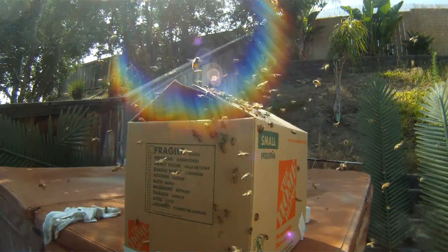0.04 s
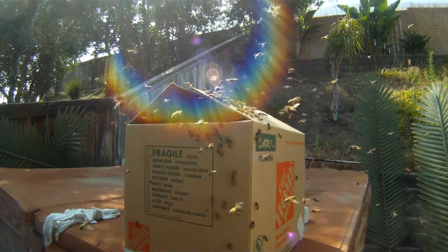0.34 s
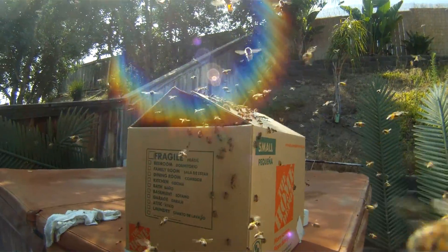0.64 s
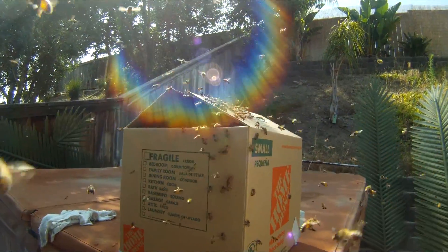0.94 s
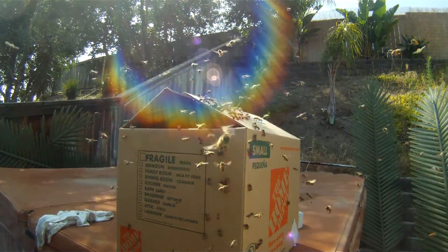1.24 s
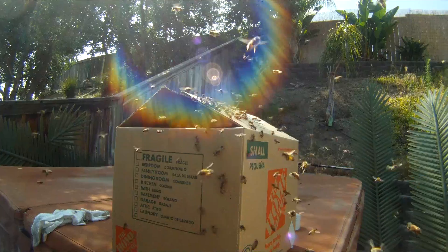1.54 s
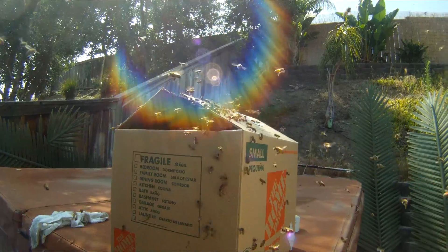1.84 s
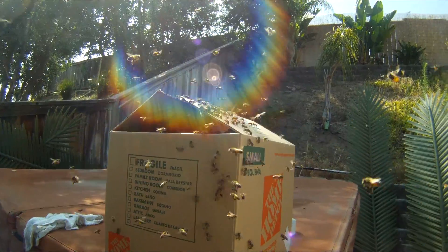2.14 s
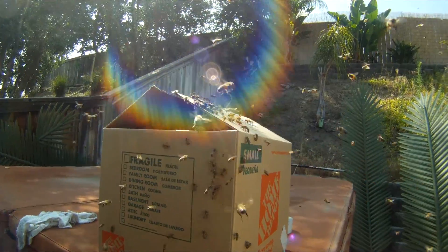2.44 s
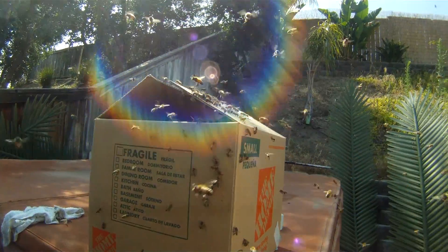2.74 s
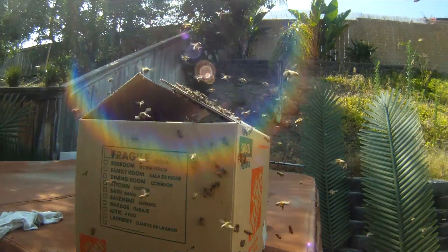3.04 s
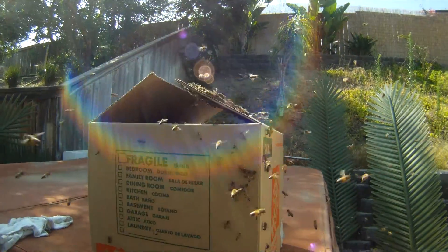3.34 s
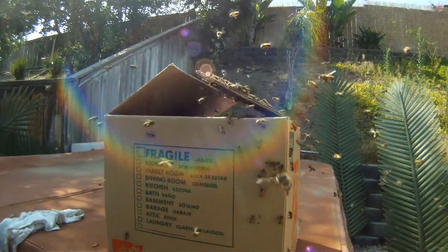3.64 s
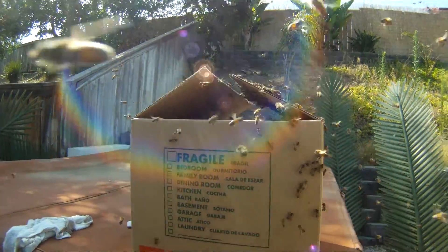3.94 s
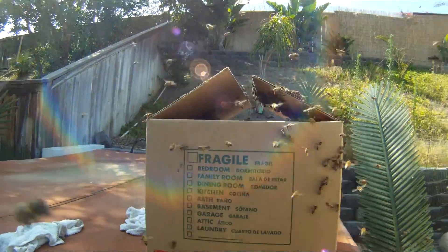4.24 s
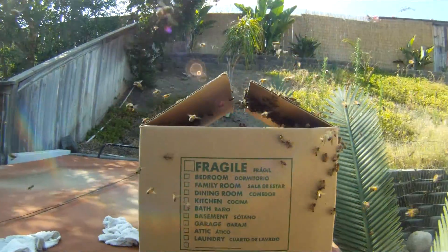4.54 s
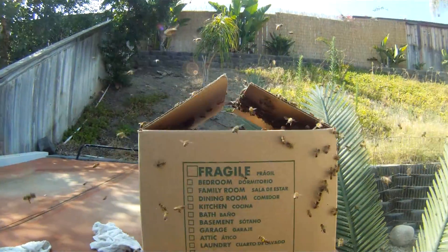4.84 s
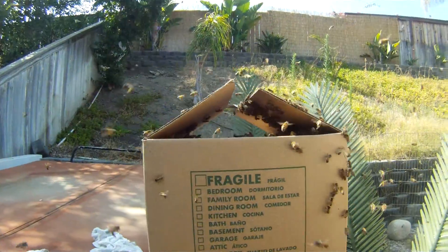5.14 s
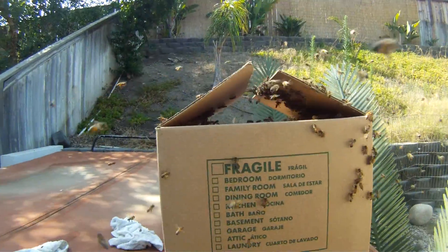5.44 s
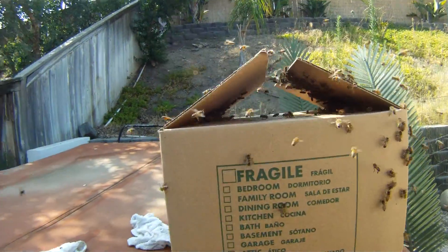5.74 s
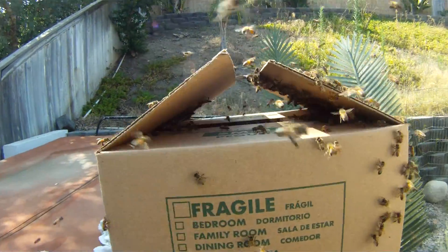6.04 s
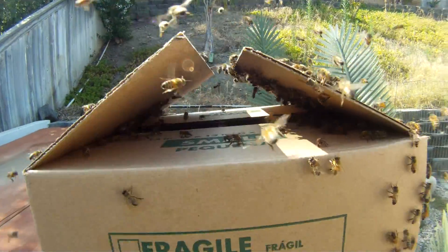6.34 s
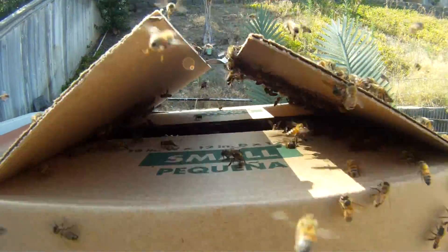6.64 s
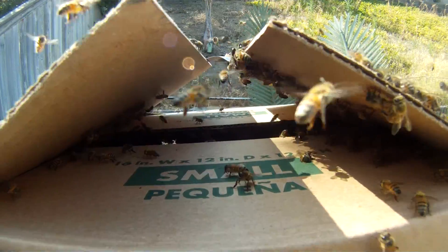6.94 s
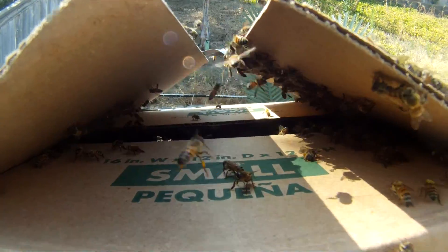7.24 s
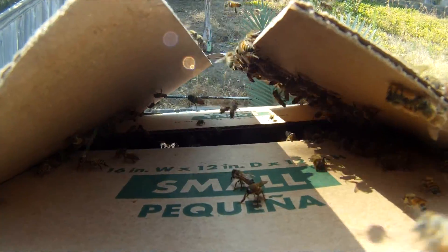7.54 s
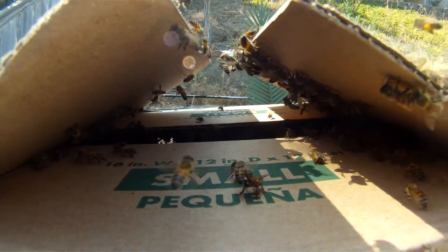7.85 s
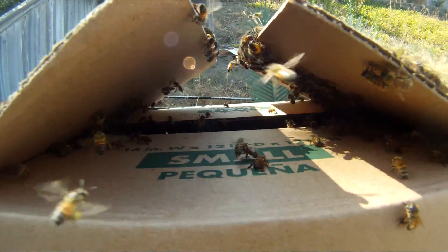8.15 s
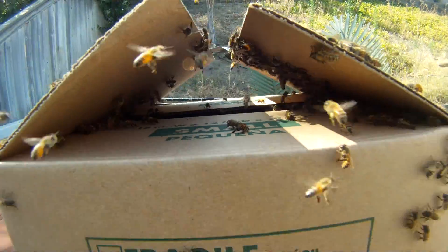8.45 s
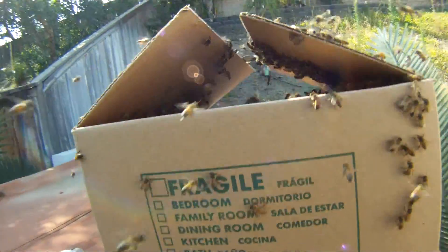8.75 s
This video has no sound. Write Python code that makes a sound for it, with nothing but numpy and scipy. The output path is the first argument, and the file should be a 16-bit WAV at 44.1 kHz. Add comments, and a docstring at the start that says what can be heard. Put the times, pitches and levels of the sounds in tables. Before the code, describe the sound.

A bee swarm hums around a cardboard box, single bees passing close, while the handheld camera rumbles, clicks and creaks.

```python
"""Honeybees hum around a cardboard box in a backyard, over the rumble of a hand holding a small camera.
Single bees pass close from the start and again later; some brush the plastic case with their wings.
From 2.7 s the hand bumps and rubs the case, which clicks and, from 5.3 s, creaks; thin treble ticks
sound now and then. The swarm grows as the camera nears the box; the handling is loudest near 8.9 s.
Throughout, the camera holds each sample at a low rate, so the treble mirrors the mid-range."""
import sys
import numpy as np
from scipy import signal
from scipy.fft import rfft, irfft, next_fast_len
from scipy.io import wavfile
from scipy.ndimage import map_coordinates

SR = 44100
rng = np.random.default_rng(int(sys.argv[2]) if len(sys.argv) > 2 else 0)


def inscribe(sig):
    """Save sig as 16-bit PCM at rate SR to the path in sys.argv[1].

    A 1-D sig is mono; a 2-D sig holds one channel per row.
    Samples are clipped to [-1, 1] before scaling.
    """
    pcm = np.round(np.clip(np.atleast_2d(sig).T, -1, 1) * 32767)
    wavfile.write(sys.argv[1], SR, pcm.astype(np.int16))


N = 396018

# hard knocks on the case: time_s, peak_db
CASE_KNOCKS = [(2.683, -36.5), (3.163, -41), (5.833, -24), (5.8682, -23), (7.778, -40), (7.85, -36),
               (8.143, -35), (8.861, -15), (8.884, -9), (8.906, -11), (8.9268, -15), (8.9629, -18)]
# fingers shifting grip: start_s, end_s, click_db, thud_db
GRIP_SHIFTS = [(5.7, 5.819, -38.5, -43), (6.119, 6.319, -58, -39.5), (8.1, 8.202, -53, -35)]


def amp(db):
    """Decibels to gain."""
    return 10 ** (np.asarray(db) / 20)


def unit(x):
    """Scale to rms 1."""
    return x / np.sqrt(np.mean(x ** 2) + 1e-20)


def peak(x):
    """Scale to peak 1."""
    return x / (np.abs(x).max() + 1e-20)


def clock(length_s=N / SR):
    """Sample times in s."""
    return np.arange(round(length_s * SR)) / SR


def wobble(knots_per_s):
    """Smooth random curve."""
    coarse = np.arange(0, N + 64, 64)
    knots = rng.standard_normal(int(N * knots_per_s / SR) + 4)
    spline = map_coordinates(knots, [coarse * knots_per_s / SR], mode="nearest")
    return np.interp(np.arange(N), coarse, spline)


def filtered(x, response):
    """Apply the gain response(hz)."""
    size = next_fast_len(len(x) + SR // 4)
    return irfft(rfft(x, size) * response(np.fft.rfftfreq(size, 1 / SR)), size)[:len(x)]


def coloured(x, points):
    """Shape x by (freq_hz, gain_db) points on a log axis; rms 1."""
    freq_hz, gain_db = np.transpose(points)
    return unit(filtered(x, lambda hz: amp(np.interp(np.log(hz + 1), np.log(freq_hz), gain_db))))


def add(track, start_s, sound):
    """Mix a sound into the track."""
    part = track[max(round(start_s * SR), 0):][:len(sound)]
    part += sound[:len(part)]


def sprinkle(spells, per_s, scatter_db=5.0):
    """Yield (time_s, level_db) of chance events over (start_s, end_s, level_db) spells."""
    for start_s, end_s, db in spells:
        count = max(round((end_s - start_s) * per_s), 1)
        times_s = start_s + (end_s - start_s) * (np.arange(count) + rng.random(count)) / count
        yield from zip(times_s, db + scatter_db * rng.standard_normal(count))


def wingbeats(pitch_hz, gain):
    """One pressure pulse per wing stroke, placed between samples."""
    turns = rng.random() + np.cumsum(pitch_hz) / SR
    at = np.interp(np.arange(1, int(turns[-1])), turns, np.arange(N))
    i = at.astype(int)
    shares = np.r_[gain[i] * (1 - at + i), gain[i] * (at - i)]
    return np.bincount(np.r_[i, i + 1], shares, N + 1)[:N]


def swarm(count=26, pitch_hz=240, spread=0.05, wander=0.035, distance_db=4):
    """Many bees, each wandering in pitch and distance, heard through the microphone cavity."""
    # hum rising as the camera nears the box: time_s, level_db
    approach = [(0.0, -66), (1.5, -68.5), (5.25, -66.5), (5.8, -64.5), (8.2, -62.5), (8.6, -62)]
    # swarm spectrum: freq_hz, gain_db
    buzz_spectrum = [(110, -47.5), (180, -9), (239, -4), (292, -24), (423, 2), (467, -3), (814, -14),
                     (1230, 1), (1500, -4.5), (1660, -10), (1830, -2), (2770, -5.5), (3420, -8),
                     (4240, -19), (5400, -11.5), (7020, -70.5), (11900, -120)]
    # background air: freq_hz, gain_db
    air_spectrum = [(60, 5), (200, 2), (400, -2.5), (800, -5), (2000, -10.5), (3000, -13.5), (4200, -13.5),
                    (5500, -17)]
    # microphone cavity resonances: centre_hz, width_hz, gain_db
    cavity_modes = [(1277, 100, -0.5), (1495, 108.1, 2.5), (1795.5, 109.6, 5), (2152, 208.8, 5),
                    (3420, 130, 0), (3550, 95.7, 5.5)]
    beats = np.zeros(N)
    for place in np.linspace(-1.7, 1.7, count):
        bee_hz = pitch_hz * np.exp(spread * place + wander * wobble(4) + 0.006 * wobble(30))
        beats += wingbeats(bee_hz, amp(distance_db * wobble(2.526)))
    hum_db = np.interp(clock(), *np.transpose(approach)) + 4.5
    hum = amp(hum_db) * coloured(beats, buzz_spectrum)
    air = amp(-58) * coloured(rng.standard_normal(N), air_spectrum)
    cavity_db = lambda hz: sum(db / (1 + (2 * (hz - f) / width) ** 2) for f, width, db in cavity_modes)
    return filtered(hum + air, lambda hz: amp(cavity_db(hz) - 3.5))


def hand(still_db=-58, settle_db_per_s=-0.83, attack_s=0.097, release_s=0.0807, grain_db=3, sway_db=2):
    """The grip rumbles unevenly, more with each move; skin slides over the case in grainy strokes."""
    # grip rumble: freq_hz, gain_db
    rumble_spectrum = [(8.8, -29), (15, -2), (32, 2.5), (48, -1), (80, -12), (109, -15), (151, -23.5),
                       (242, -31), (300, -25), (390, -59), (660, -120)]
    # camera moves: start_s, end_s, rumble_db
    moves = [(2.848, 3.72, -50), (3.74, 4.45, -53.5), (4.626, 5.04, -50), (5.26, 6.461, -50.5),
             (6.607, 8.8, -54), (8.826, 8.98, -39.5)]
    # skin strokes: centre_s, half_length_s, level_db
    rubs = [(3.11, 0.2, -60.5), (5.436, 0.021, -51.5), (5.713, 0.056, -52.5), (5.808, 0.034, -55),
            (6.134, 0.044, -55), (6.285, 0.036, -47.5), (8.167, 0.14, -60.5), (8.765, 0.062, -50.5),
            (8.875, 0.047, -38.5), (8.966, 0.008023, -41)]
    # skin friction: freq_hz, gain_db
    rub_spectrum = [(100, 9.5), (380, 1), (550, -14.5), (900, -2), (1500, 3), (2000, 4), (2600, -4.5),
                    (3500, -8), (4200, -13), (5500, -18)]
    t = clock()
    strokes = sum(amp(db) * np.exp(-0.5 * ((t - s) / half_s) ** 2) for s, half_s, db in rubs)
    friction = coloured(rng.standard_normal(N) * amp(grain_db * wobble(350)), rub_spectrum)
    ramps = [amp(db) * np.interp(t, [start - attack_s, start, end, end + release_s], [0, 1, 1, 0])
             for start, end, db in moves]
    effort = np.hypot(amp(still_db + settle_db_per_s * t), np.max(ramps, axis=0))
    rumble = amp(sway_db * wobble(12)) * coloured(rng.standard_normal(N), rumble_spectrum)
    return strokes * friction + effort * rumble


def hiss(level_db=-73):
    """Faint steady hiss, separate in each channel."""
    # hiss spectrum: freq_hz, gain_db
    spectrum = [(25, -14.5), (120, 7.5), (400, 12.5), (2000, 11), (5500, 10)]
    return np.array([held(amp(level_db) * coloured(rng.standard_normal(N), spectrum)) for _ in range(2)])


def near_bees(flutter=0.008, swerve_db=4.5):
    """Each close bee swells and fades with distance while its pitch slides and wavers."""
    # fly-bys: nearest_s, half_length_s, coming_hz, leaving_hz, level_db
    passes = [(0.463, 0.074897, 234.6, 211, -58), (.625, 0.037, 247.8, 207, -57),
              (0.725, 0.055, 270, 247.3, -60.5), (.82, 0.05442, 261.5, 276.1, -67),
              (1.19, 0.068, 231, 219.6, -70.5), (3.027, 0.074, 246, 231, -64),
              (6.621, 0.07077, 251, 234, -62), (6.756, 0.093, 232.5, 237.5, -66.5)]
    # close bee spectrum: freq_hz, gain_db
    spectrum = [(220, 3.5), (460, 2), (700, -11), (900, -8), (1130, 3.5), (1450, -16.5), (2000, -5.5),
                (3000, -25), (5000, -21)]
    out, t = np.zeros(N), clock()
    for nearest_s, half_s, coming_hz, leaving_hz, db in passes:
        along = (t - nearest_s) / half_s
        pitch_hz = coming_hz + (leaving_hz - coming_hz) * (1 + np.tanh(along)) / 2
        beats = wingbeats(pitch_hz * (1 + flutter * wobble(40)), amp(swerve_db * wobble(25)))
        nearness = np.exp(-(along / 2) ** 2) / np.sqrt(1 + along ** 2)
        out += amp(db) * coloured(beats, spectrum) * nearness
    return out


def case_ring(scatter_db=4.5, detune_s=0.000566):
    """Tap response: neighbouring modes swing in opposite senses; the grip detunes damped ones most."""
    # plastic case modes: freq_hz, level_db, t60_s
    modes = [(135, -19, 0.01769), (377.17, -21.5, 0.35), (547, -14, 0.0097), (751.3, -12.5, 0.010168),
             (957, -16, 0.03855), (1137, -8, 0.01747), (1310, -22.5, 0.081), (1700, -11, 0.01823),
             (2090, 0.5, 0.024), (2500, -15.5, 0.0079), (2740, -16, 0.015), (3364, -8.5, 0.037),
             (3413, -14.5, 0.018913), (5240, -28, 0.0093)]
    t, ring = clock(0.2), 0
    for k, (hz, db, t60_s) in enumerate(modes):
        pitch_hz = hz * (1 + detune_s / t60_s * rng.normal())
        envelope = amp(db + scatter_db * rng.normal() - 60 * t / t60_s)
        ring += (-1) ** k * envelope * np.sin(2 * np.pi * pitch_hz * t)
    return ring


def snap(crack_db=-2, crack_t60_s=0.013237, grip_t60_s=0.05174, crack_hz=(1000, 3500)):
    """One hard contact at peak 1: a brief crack and a ring that the grip damps."""
    t = clock(0.2)
    burst = rng.standard_normal(len(t)) * amp(-60 * t / crack_t60_s)
    crack = signal.sosfilt(signal.butter(3, crack_hz, "band", fs=SR, output="sos"), burst)
    ring = peak(case_ring()) * amp(-60 * t / grip_t60_s)
    return peak(ring + amp(crack_db) * peak(crack))


def brushes(highpass_hz=2000, jitter_s=0.00026):
    """A bee drifts in and away, touching the case each wing stroke; only the high modes wake."""
    # wing contacts: start_s, length_s, wingbeat_hz, peak_db
    contacts = [(0.441, 0.031, 219, -47.5), (0.489, 0.051, 218.7, -46), (3.05, 0.02437, 241, -42),
                (3.188, 0.011994, 245, -38.5), (7.575, 0.028, 217.8, -31)]
    out = np.zeros(N)
    for start_s, length_s, beat_hz, db in contacts:
        touch = peak(signal.lfilter(*signal.butter(2, highpass_hz, "high", fs=SR), snap()))
        for delay_s in np.arange(0, length_s, 1 / beat_hz):
            time_s = start_s + delay_s + jitter_s * rng.random()
            swell = np.sin(np.pi * delay_s / length_s)
            add(out, time_s, amp(db + rng.normal()) * swell * touch)
    return out


def bumps(knock_s=0.00052005, thud_s=0.0015, push_db=-5, push_hz=115, push_t60_s=0.017):
    """A fingertip shoves the camera; the longer the contact, the fewer high case modes wake."""
    # soft finger-pad thuds: time_s, peak_db
    thuds = [(3.013, -36.5), (3.087, -37.5), (5.425, -31.5), (5.736, -35.5), (5.869, -28), (6.104, -37.5),
             (7.997, -39), (8.104, -36), (8.251, -30)]
    out, t = np.zeros(N), clock(0.2)
    faint = sprinkle([(start, end, db) for start, end, _, db in GRIP_SHIFTS], per_s=9)
    for contact_s, blows in (knock_s, CASE_KNOCKS), (thud_s, [*thuds, *faint]):
        force = np.hanning(max(int(contact_s * SR * 1.67), 4))
        for time_s, db in blows:
            grip_t60_s = 0.045 * amp(db + 40) ** 0.4726  # hard knocks shake off the damping fingers
            ring = case_ring() * amp(-60 * t / grip_t60_s)
            knock = peak(np.convolve(force, ring)[:len(t)])
            pitch_hz = push_hz * np.exp(0.0919 * rng.normal())
            push = amp(push_db - 60 * t / push_t60_s) * np.sin(2 * np.pi * pitch_hz * t)
            add(out, time_s - contact_s / 2, amp(db) * peak(knock + push))
    return out


def clicks(hard_knock_db=-30, knock_to_click_db=-10.5):
    """The case snaps under the fingers: singly, in runs, at strong knocks and as the grip shifts."""
    # sharp case clicks: time_s, level_db
    singles = [(3.11, -41), (5.412, -34.5), (5.448, -18.5), (5.455, -22), (5.521, -36), (5.834, -26),
               (5.928, -41), (8.175, -41), (8.469, -41.5), (8.499, -37), (8.814, -14), (8.854, -23.5),
               (8.904, -13)]
    out = np.zeros(N)
    knocked = [(s, db + knock_to_click_db) for s, db in CASE_KNOCKS if db > hard_knock_db]
    faint = sprinkle([(start, end, db) for start, end, db, _ in GRIP_SHIFTS], per_s=9)
    for time_s, db in [*singles, *rattles(), *knocked, *faint]:
        add(out, time_s + 0.00055, amp(db + 2.5) * snap())
    return out


def ticks(band_hz=(4700, 7300), t60_s=0.015, trail_db=-9, trail_s=0.045, trail_count=3):
    """Thin treble ticks, singly and in spells, each trailed by a little crackle."""
    # faint ticking: start_s, end_s, peak_db
    spells = [(3.806, 4.161, -51), (6.071, 6.368, -50)]
    # louder ticks: time_s, peak_db
    singles = [(3.997, -48.5), (4.76, -46.5), (5.5, -46), (5.5493, -41.5), (5.5968, -41), (5.7219, -36),
               (5.8274, -39)]
    out, t = np.zeros(N), clock(0.03)
    band = signal.butter(2, band_hz, "band", fs=SR)
    tick = lambda: peak(signal.lfilter(*band, rng.standard_normal(len(t)) * amp(-60 * t / t60_s)))
    for time_s, db in [*singles, *sprinkle(spells, per_s=14)]:
        add(out, time_s, amp(db) * tick())
        for delay_s in trail_s * rng.random(trail_count):
            add(out, time_s + delay_s, amp(db + trail_db - 8 * delay_s / trail_s) * tick())
    return out


def creaks(slip_hz=2015, uneven=0.095, grit=2.0, scrape_db=-6, scrape_hz=(370, 3300), grip_t60_s=0.22):
    """The seam slips in a quick, gritty run, roughly in step with the case's main mode."""
    # runs of slips: start_s, length_s, peak_db
    runs = [(5.325, 0.00605, -40.5), (5.423, 0.005168, -28.5), (5.451, 0.0051, -23.5), (5.609, 0.05, -38.5),
            (5.6367, 0.0038, -17), (5.826, 0.003474, -32), (8.176, 0.0028, -29), (8.828, 0.0046, -8.5),
            (8.869, 0.009, -10), (8.8976, 0.0032, -11.5), (8.9041, 0.0037, -0.5)]
    out = np.zeros(N)
    scrape_band = signal.butter(3, scrape_hz, "band", fs=SR, output="sos")
    for start_s, length_s, db in runs:
        count = max(int(length_s * slip_hz), 2)
        slip_s = np.cumsum(np.abs(1 + uneven * rng.standard_normal(count))) / slip_hz
        slips = np.bincount(((slip_s - slip_s[0]) * SR).astype(int), amp(2.4 * rng.standard_normal(count)))
        strain = np.linspace(1, 0.5, len(slips))
        force = (unit(slips) + grit * rng.standard_normal(len(slips))) * strain
        ring = case_ring() * amp(-60 * clock(0.2) / grip_t60_s)
        creak = peak(np.convolve(force, ring))
        add(creak, 0, amp(scrape_db) * peak(signal.sosfilt(scrape_band, force)))  # heard directly
        add(out, start_s, amp(db) * peak(creak))
    return out


def rattles(slowing=1.11):
    """Yield (time_s, level_db) of click runs that slow and fade as the case's strain is spent."""
    # the case giving way: start_s, length_s, first_gap_s, level_db, fall_db
    runs = [(8.382, .056, .0101, -30.5, 8.5), (8.519, .04, .0156, -29.5, 12)]
    for start_s, length_s, gap_s, db, fall_db in runs:
        delays_s = np.r_[0, np.cumsum(gap_s * slowing ** np.arange(10))]
        for delay_s in delays_s[delays_s < length_s]:
            yield start_s + delay_s, db - fall_db * delay_s / length_s


def held(x, hold_hz=12000, edge_hz=5600):
    """The converter clips and holds each sample: the band mirrors around the rate, under a sinc slope."""
    base = filtered(np.clip(x, -1, 1), lambda hz: 1 / np.sqrt(1 + (hz / edge_hz) ** 36))
    mirrored = base * (1 + 2 * np.cos(2 * np.pi * hold_hz * clock()))
    return filtered(mirrored, lambda hz: np.sinc(hz / hold_hz))


def scene():
    """Bees and handling reach one microphone; thin ticks and stereo hiss lie on top."""
    microphone = swarm() + near_bees() + brushes() + hand() + clicks() + creaks() + bumps()
    return held(microphone) + ticks() + hiss()


def record(dry, top_hz=15500):
    """The camera keeps nothing above its band limit."""
    return np.array([filtered(x, lambda hz: hz < top_hz) for x in dry])


dry = scene()
out = record(dry)
inscribe(out)
```